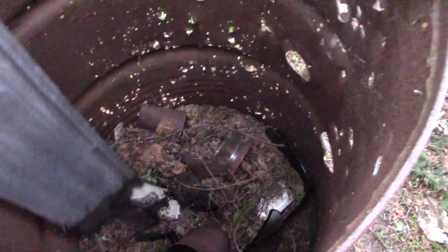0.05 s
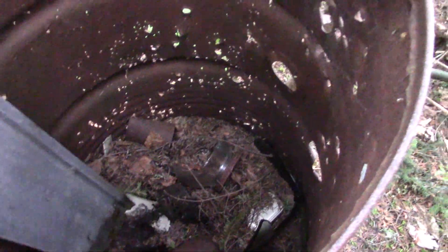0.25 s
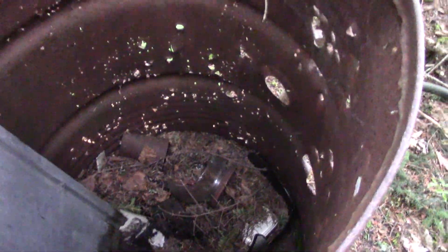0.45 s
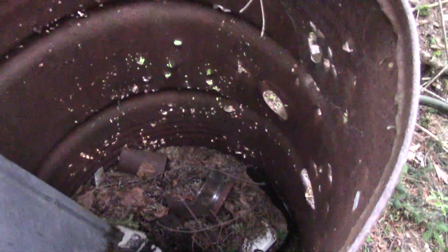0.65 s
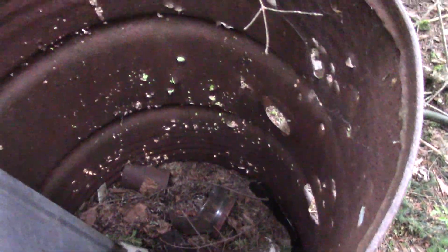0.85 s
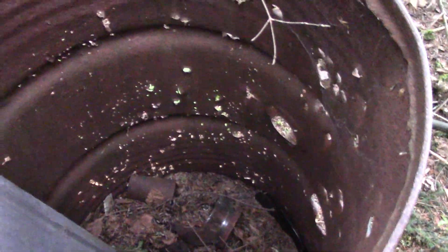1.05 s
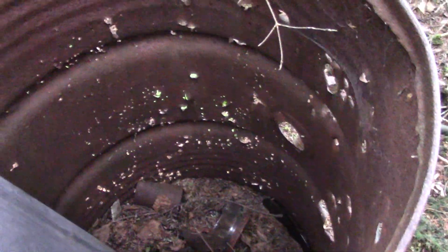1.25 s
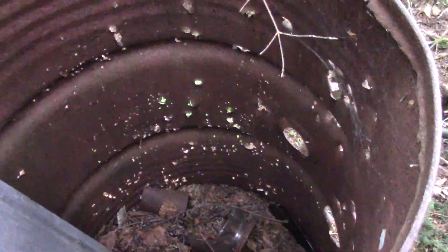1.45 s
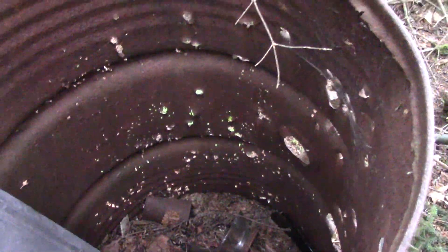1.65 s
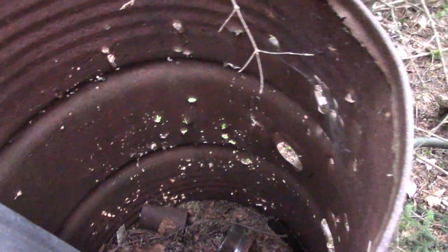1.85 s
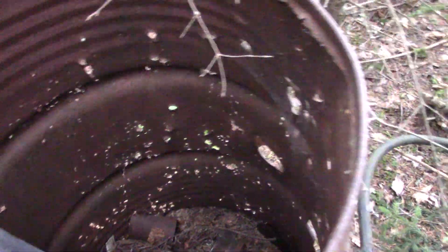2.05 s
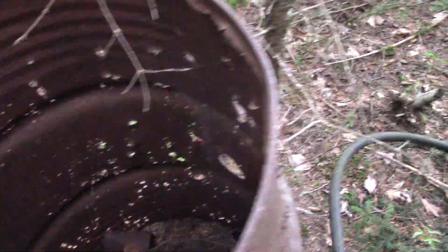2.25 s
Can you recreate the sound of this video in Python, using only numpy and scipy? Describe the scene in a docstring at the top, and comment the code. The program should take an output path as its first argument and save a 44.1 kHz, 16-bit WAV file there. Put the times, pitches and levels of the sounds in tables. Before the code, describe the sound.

A metal bar knocks inside a rusty steel barrel outdoors. It scrapes, crunches into junk with a hollow ring, then strikes the wall and bounces. Soft dull bumps and a faint leaf rustle follow, heard close at the rim.

```python
"""A rusty steel barrel rings as a metal bar is pushed into it, outdoors. The bar scrapes, rams the junk
inside with a crunch, then knocks on the wall and bounces. Each blow excites a short crack, a dense wash
of weak shell modes and clear decaying tones; the scrape is gritty noise with one wall resonance.
At the end come dull bumps and a rustle of dry leaves, over faint outdoor air."""
import sys
import numpy as np
from scipy import signal
from scipy.io import wavfile

SR = 44100
rng = np.random.default_rng(int(sys.argv[2]) if len(sys.argv) > 2 else 0)


def materialize(psi):
    """Save the field psi as 16-bit PCM at rate SR to the path in sys.argv[1].

    A 1-D psi becomes a single channel; in a 2-D psi each row is a channel.
    """
    bounded = np.clip(np.atleast_2d(psi).T, -1, 1)
    quanta = np.round(bounded * 32767).astype(np.int16)
    wavfile.write(sys.argv[1], SR, quanta)


N = 105840
TIME = np.arange(N) / SR
MODE_RISE_CYCLES = 4.1   # low modes build up more slowly

# stereo width of barrel and bumps: f/Hz, side re mid/dB
BARREL_WIDTH = [(60, -15.5), (130, -21.5), (290, -30), (640, -34), (1410, -19.5), (3100, -15.5),
                (6820, -16.5), (15000, -15.5)]
# stereo width of leaves and air: f/Hz, side re mid/dB
OPEN_WIDTH = [(60, -6.5), (150, -10.5), (380, -12), (950, -6.5), (2380, -6.5), (5980, -13), (15000, -19.5)]


def ram():
    """The bar brushes the wall, then crunches into the junk in quick contacts; the barrel rings."""
    # t/s, level/dB, treble cut-off/Hz
    contacts = [(0.188, -26, 2990), (0.233, -16.5, 15000), (.2350, 5.5, 6950), (.2385, -1.5, 11000),
                (0.2444, 1, 11000), (0.2507, 0, 12000), (0.2569, -2.5, 13000), (0.262, -4.5, 13900),
                (.2720, -4.5, 7000)]
    ring_start_s = np.median([s for s, db, hz in contacts[:-1]])
    return shell_wash(contacts, column=1, crack_t60_s=0.056) + from_db(1) * delay(ring_start_s, modes(1))


def knocks():
    """The bar strikes the wall and bounces; softer contacts feed only the low modes."""
    # t/s, level/dB, treble cut-off/Hz, relative mode level/dB
    contacts = [(0.718, 1, 10840, -0.5), (0.7918, -8.5, 6600, -3), (0.833, -19.5, 6200, -18.5),
                (.9600, -16, 7900, -16), (.9980, -27, 6000, -23.5)]
    tones = 0
    for s, _, cut_hz, ring_db in contacts:
        ring = lowpass(modes(column=2), 0.17 * cut_hz)
        tones += from_db(ring_db + 0.5) * delay(s, ring)
    return shell_wash(contacts, column=2, crack_t60_s=0.087) + tones


def shell_wash(contacts, column, crack_t60_s):
    """Each contact sets off a crack and the shell's dense ring, whose treble dies first."""
    # weak shell modes per third octave: f/Hz, ram level/dB, knock level/dB, t60/s
    wash_bands = [(50, -61, -72, 0.62), (102, -54.5, -42.5, 0.85), (180, -58.5, -51.5, 0.49),
                  (280, -42, -42.5, 0.93), (550, -35.5, -31.5, 0.44), (1020, -42.5, -29.5, 0.6),
                  (1690, -27, -24.5, 0.17), (2500, -34, -32.5, .36), (4580, -33, -34.5, 0.1),
                  (6500, -46.5, -49, .26), (10800, -36.5, -73, 0.18), (15000, -54.5, -70.5, .18)]
    # contact crack per third octave: f/Hz, ram level/dB, knock level/dB
    crack_bands = [(60, -78, -92), (210, -48.5, -27), (500, -25, -27.5), (1500, -22.5, -31),
                   (3000, -20.5, -27.5), (4630, -52, -42.5), (6483, -22.5, -26), (9500, -30.5, -37.5),
                   (15000, -35.5, -38)]
    # f/Hz, left minus right/dB
    balance = [(500, 0), (1400, .4), (2800, .8), (5500, 1.5), (10000, .7)]
    response = force = 0
    for hz, band in noise_bands(BARREL_WIDTH):
        ring = from_db(at_hz(wash_bands, hz, column)) * decay(at_hz(wash_bands, hz, column=3))
        crack = from_db(at_hz(crack_bands, hz, column)) * decay(crack_t60_s)
        pan = from_db(np.array([[.5], [-.5]]) * at_hz(balance, hz))
        response += pan * band * (ring + crack)
    for s, db, cut_hz, *_ in contacts:
        jitter_s = rng.normal(0, .0002)
        force += delay(s + jitter_s, from_db(db) * lowpass(signal.unit_impulse(N), cut_hz))
    shell = signal.fftconvolve(response, force[None], axes=1)[:, :N]
    return highpass(shell, hz=160)   # the shell's ring and crack are cut below about 160 Hz


def modes(column):
    """The barrel's clear tones for 1 s after a blow; each beats slowly with a weaker twin."""
    # f/Hz, relative ram level/dB, relative knock level/dB, t60/s
    barrel_modes = [ (288, -15, -25, .62), (347, -36, -34, .7), (406, -22, -38, .28), (450, -28, -45, .4),
                    (519, -29, -29, .5), (534, -45, -27, .75), (576, -36, -25, .55), (595, -22, -32, .52),
                    (659, -30, -30, .45), (709, -24, -42, .55), (728, -45, -30, .78), (779, -27, -40, .5),
                    (796, -45, -30, .45), (932, -36, -27, .45), (1002, -24, -24, .3), (1138, -29, -32, .45),
                    (1210, -42, -30, .38), (1320, -21, -25, .3), (1531, -26, -33, .38),
                    (1579, -22, -34, .38), (1688, -14, -28, .14), (1757, -32, -30, .3),
                    (1873, -20, -35, .28), (2015, -25, -33, .28), (2176, -25, -42, .24),
                    (2377, -24, -40, .22), (2527, -23, -32, .22), (2602, -23, -42, .22),
                    (2857, -25, -46, .2), (3216, -25, -46, .17), (3350, -23, -40, .13)]
    t, out = TIME[:SR], np.zeros(N)
    for row in barrel_modes:
        hz, t60_s = row[0], row[3]
        phase, twin_phase, split = rng.uniform(-1, 1, 3)
        twin_hz = hz + 7 * split / t60_s ** .5
        tone = np.sin(2 * np.pi * (hz * t + phase))
        twin = from_db(-15) * np.sin(2 * np.pi * (twin_hz * t + twin_phase))
        envelope = np.exp(-np.log(1000) * t / t60_s) * (1 - np.exp(-t * hz / MODE_RISE_CYCLES))
        out[:SR] += from_db(row[column]) * (tone + twin) * envelope
    return out


def hum(hz=398.5, t60_s=1.5):
    """The barrel's longest note, set off by the two big blows."""
    # t/s, level/dB
    blows = [(0.251, -33.5), (0.7181, -31)]
    rise = 1 - np.exp(-TIME * hz / MODE_RISE_CYCLES)
    note = np.sin(2 * np.pi * hz * TIME) * decay(t60_s) * rise
    return sum(from_db(db) * delay(s, note) for s, db in blows)


def slide(wall_hz=1570):
    """The bar catches and slips over rust, exciting one wall resonance."""
    # t/s, level/dB
    envelope = [(0, -59), (.075, -65.5), (.095, -50.5), (.14, -48.5), (.175, -51), (.19, -45.5),
                (.228, -38), (.262, -24.5), (.29, -28), (.305, -51.5), (.35, -35.5), (.385, -49.5),
                (.45, -47), (.51, -52.5), (.565, -48), (.6, -51), (.66, -54), (.71, -47), (.76, -49.5),
                (1.1, -71.5)]
    # f/Hz, third-octave level/dB
    spectrum = [(100, -64), (400, -21.5), (800, -5.5), (1600, -2.5), (2500, -5), (5000, -5), (10000, -6.5),
                (15000, -19.5)]
    scrape = level(envelope) * coloured_noise(spectrum, BARREL_WIDTH) * grain(rate_hz=200, spread_db=1.5)
    resonance = signal.lfilter(*signal.iirpeak(wall_hz, Q=25, fs=SR), scrape)
    return scrape + from_db(6.5) * resonance


def bumps():
    """Soft contacts ring a few cycles and leave a dull noise tail."""
    # t/s, level/dB, f/Hz, t60/s
    contacts = [(2.162, -55, 600, 0.018), (2.1823, -18, 404, 0.014), (2.3312, -24, 500, 0.015),
                (2.3695, -25.5, 1020, 0.0083), (2.379, -28.5, 680, 0.02)]
    # f/Hz, third-octave level/dB
    tail_spectrum = [(100, -42), (200, -15), (330, 3), (480, -2.5), (1200, 0), (2500, -27), (15000, -51)]
    tail_noise = from_db(-22.5) * coloured_noise(tail_spectrum, BARREL_WIDTH)
    out = 0
    for s, db, hz, t60_s in contacts:
        thud = lowpass(np.sin(2 * np.pi * hz * TIME) * decay(t60_s), hz=880)
        tail = tail_noise * delay(s, decay(t60_s=.18))
        out += from_db(db) * highpass(delay(s, thud) + tail, 0.8 * hz)
    return out


def leaves():
    """Dry leaves crackle; grit and twigs give a few single snaps."""
    # rustle: t/s, level/dB
    envelope = [(2.0, -88.5), (2.14, -66.5), (2.183, -66), (2.196, -48), (2.222, -47), (2.242, -53.5),
                (2.31, -61.5), (2.36, -61.5), (2.4, -55)]
    # f/Hz, third-octave level/dB
    spectrum = [(200, -34.5), (1000, -6.5), (2500, 1), (6000, 5), (10000, 1), (15000, -5)]
    # t/s, level/dB
    snap_events = [(.345, -44), (2.2145, -44), (2.2738, -34)]
    hiss = coloured_noise(spectrum, OPEN_WIDTH)
    rustle = level(envelope) * grain(rate_hz=900, spread_db=3.5)
    snaps = sum(from_db(db) * delay(s, decay(t60_s=0.0039)) for s, db in snap_events)
    return hiss * (rustle + snaps)


def air():
    """Faint outdoor noise, drifting in level."""
    # t/s, level/dB
    envelope = [(0, -52), (.3, -56), (1.2, -56), (1.6, -58), (1.68, -57), (1.74, -55), (1.85, -56),
                (2.05, -55), (2.15, -53), (2.26, -58.5), (2.4, -48.5)]
    # f/Hz, third-octave level/dB
    spectrum = [(30, -46), (60, -22), (120, -11.5), (250, -0.5), (450, 1), (900, -5), (2000, -7.5),
                (6000, -10.5), (10000, -14), (15000, -22)]
    return level(envelope) * coloured_noise(spectrum, OPEN_WIDTH)


def noise_bands(width):
    """Yield third-octave bands: f/Hz, stereo noise of rms 1."""
    white = rng.standard_normal((2, 2, N))
    for k, hz in enumerate(1000 * 2 ** (np.arange(-14, 13) / 3)):
        sos = signal.butter(2, [hz / 1.1225, hz * 1.1225], "band", fs=SR, output="sos")
        mid, side = signal.sosfilt(sos, white[k % 2])[:, ::-1]
        yield hz, unit_rms(mid + np.array([[1], [-1]]) * side * from_db(at_hz(width, hz)))


def coloured_noise(spectrum, width):
    """Stereo noise of a given spectral shape, rms 1."""
    return unit_rms(sum(from_db(at_hz(spectrum, hz)) * band for hz, band in noise_bands(width)))


def grain(rate_hz, spread_db):
    """Randomly flickering gain, rms 1."""
    steps = rng.standard_normal(N)
    return unit_rms(from_db(spread_db * np.interp(TIME * rate_hz, np.arange(N), steps)))


def at_hz(table, hz, column=1):
    """Interpolate a column over log frequency."""
    table = np.array(table)
    return np.interp(np.log(hz), np.log(table[:, 0]), table[:, column])


def level(envelope):
    """Gain over time from rows of t/s, level/dB."""
    return from_db(np.interp(TIME, *np.transpose(envelope)))


def from_db(db):
    return 10 ** (np.asarray(db) / 20)


def unit_rms(x):
    return x / np.sqrt(np.mean(x ** 2) + 1e-20)


def decay(t60_s):
    return np.exp(-np.log(1000) * np.minimum(TIME / t60_s, 10))


def delay(s, x):
    start = int(s * SR)
    return np.concatenate([np.zeros(x.shape[:-1] + (start,)), x[..., :N - start]], axis=-1)


def lowpass(x, hz):
    return signal.sosfilt(signal.butter(2, min(hz, SR / 2 - 100), fs=SR, output="sos"), x + 1e-18)


def highpass(x, hz):
    return signal.sosfilt(signal.butter(2, hz, "high", fs=SR, output="sos"), x + 1e-18)


def scene():
    """All sources, heard at the barrel's rim."""
    return ram() + knocks() + hum() + slide() + leaves() + bumps() + air()


def record(dry):
    """Soft clipping, then a steep treble cut."""
    stopband_hz = 16900
    return signal.sosfilt(signal.cheby2(12, 70, stopband_hz, fs=SR, output="sos"), np.tanh(dry))


dry = scene()
out = record(dry)
materialize(out)
```